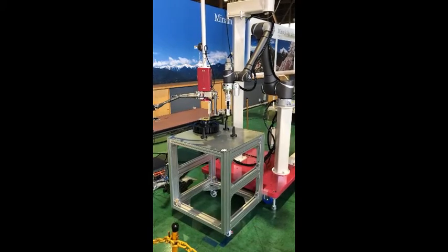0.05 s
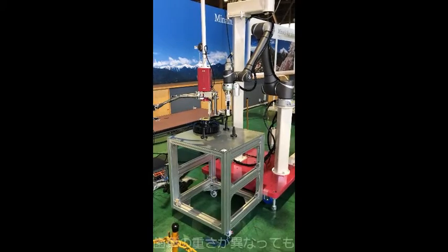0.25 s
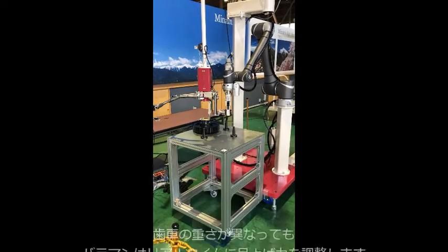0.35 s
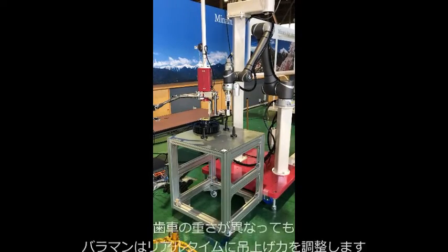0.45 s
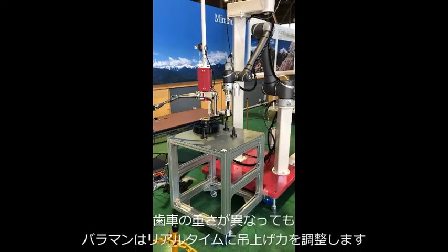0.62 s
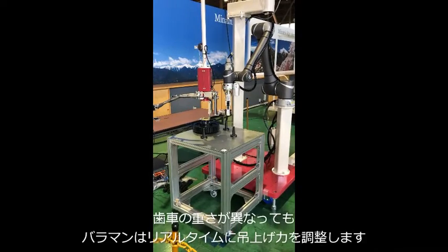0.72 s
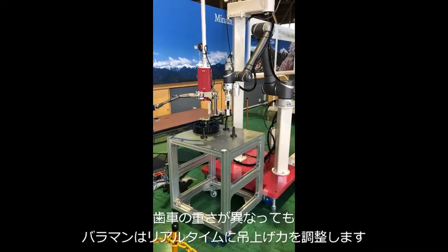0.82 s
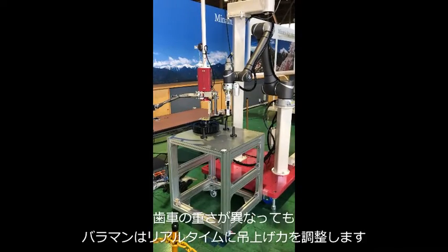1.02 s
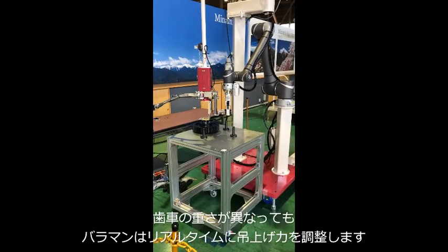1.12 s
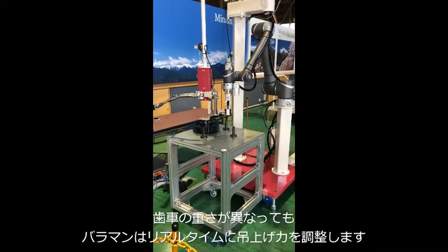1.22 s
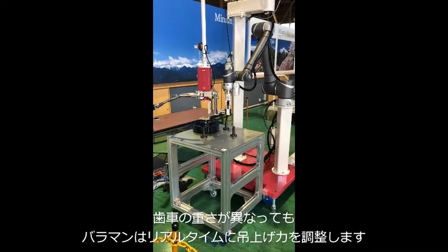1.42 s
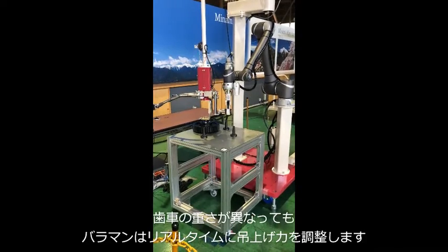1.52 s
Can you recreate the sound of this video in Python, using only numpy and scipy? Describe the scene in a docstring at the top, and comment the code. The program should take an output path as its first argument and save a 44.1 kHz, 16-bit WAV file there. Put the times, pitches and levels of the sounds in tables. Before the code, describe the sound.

A single bright hiss of compressed air escapes as a valve opens, with a slight ring and a soft low rush. It dies away in the echo of a large workshop, leaving steady ventilation and faint machine hum.

```python
"""Ventilation noise and a faint machine hum fill a large workshop hall.
At 0.2 s the valve of a pneumatic lifting arm opens: compressed air hisses through a ringing port.
The jet holds briefly, then dulls and fades as the pressure drains; a low rush peaks at 0.5 s.
The hall carries the hiss on for a second. The treble dips briefly a few times throughout."""
import sys
import numpy as np
from scipy import signal
from scipy.fft import irfft
from scipy.io import wavfile
from scipy.ndimage import uniform_filter1d

SR = 44100
rng = np.random.default_rng(int(sys.argv[2]) if len(sys.argv) > 2 else 0)


def wav_out(sig):
    """Save sig, one row per channel (or a flat mono array), as 16-bit PCM at SR to the path in sys.argv[1]."""
    wavfile.write(sys.argv[1], SR, np.round(np.clip(np.atleast_2d(sig).T, -1, 1) * 32767).astype(np.int16))


N = 68355
TIME_S = np.arange(N) / SR


def amp(db):
    """Decibels to gain."""
    return 10 ** (np.asarray(db) / 20)


def unit_rms(x):
    """Scales to rms 1."""
    return x / np.sqrt(np.mean(x ** 2) + 1e-20)


def lookup(table, hz):
    """Interpolates on a log-frequency axis."""
    table_hz, values = np.transpose(table)
    return np.interp(np.log(hz + 1), np.log(table_hz + 1), values)


def stft_filter(x, gain, size=256):
    """Filters x by the time-varying gain(Hz, s)."""
    frames = dict(fs=SR, nperseg=size, noverlap=size * 3 // 4)
    hz, t, spectra = signal.stft(x, **frames)
    return signal.istft(spectra * gain(hz[:, None], t), **frames)[1][:len(x)]


def noise(gain):
    """Noise of rms 1 with the spectrum gain(Hz)."""
    hz = np.fft.rfftfreq(N, 1 / SR)
    phasors = np.exp(2j * np.pi * rng.random(len(hz)))
    return unit_rms(irfft(gain(hz) * phasors, N))


def resonance(centre_hz, half_width_hz):
    """Noise of rms 1 in one narrow peak."""
    return noise(lambda hz: 1 / (1 + ((hz - centre_hz) / half_width_hz) ** 2))


# Ventilation spectrum (frequency [Hz], relative density [dB])
VENT_SPECTRUM = [(20, -32), (38, -20), (52, -2.5), (80, -6.5), (130, -2.5), (290, 0.5), (430, -8),
                 (600, -9), (900, -12.5), (1500, -16), (2300, -18.5), (3200, -25), (4500, -27),
                 (6000, -31.5), (10000, -37), (16000, -38.4)]

def ventilation(level_db=-47.5, patch_db=1.8):
    """Ventilation noise; patches of its spectrum drift in level, less so in the treble."""
    def patches(hz, t):
        field = rng.standard_normal((len(t), len(hz))).T
        field = uniform_filter1d(field, size=8, axis=0)
        field = uniform_filter1d(field, size=10, axis=1)
        return amp(patch_db * unit_rms(field) / (1 + hz / 3000))
    steady = noise(lambda hz: amp(lookup(VENT_SPECTRUM, hz)))
    return amp(level_db) * stft_filter(steady, patches, size=1024)


# Hum peaks (frequency [Hz], half width [Hz], level [dB])
HUM_PEAKS = [(101, 3.2, -58.5), (299, 17, -62.5), (514, 5.3, -63.5)]

def machine_hum():
    """A machine hums in narrow, wavering bands."""
    return sum(amp(db) * resonance(hz, half_width_hz) for hz, half_width_hz, db in HUM_PEAKS)


def low_rush(peak_s=0.51, sigma_s=0.16, level_db=-45, centre_hz=128):
    """A low rush of air swells and sinks behind the hiss."""
    swell = np.exp(-((TIME_S - peak_s) / sigma_s) ** 2 / 2)
    band = noise(lambda hz: np.exp(-np.log2((hz + 1) / centre_hz) ** 2))
    return amp(level_db) * swell * band


# Hall reverberation time (frequency [Hz], T60 [s])
HALL_DECAY = [(100, 3.6), (500, 1.8), (1500, 2.47), (2800, 2.03), (3950, 1.8), (4500, 1.3), (5500, 1.19),
              (8000, 0.79), (14000, 0.55)]
# Hall tail against the direct sound (frequency [Hz], level [dB])
HALL_LEVEL = [(100, 2), (1000, 4.5), (2000, 5), (2800, 3.5), (4000, -1), (7000, -3), (14000, -9.5)]

def hall(x, delay_s=0.013, build_s=0.022, half_turn_s=0.3027):
    """Diffuse echoes build and die, treble first; moving air drifts the sound between two tails."""
    def decay(hz, t):
        rate_per_s = np.log(1000) / lookup(HALL_DECAY, hz)
        energy_norm = np.sqrt(2 * rate_per_s / SR)
        return amp(lookup(HALL_LEVEL, hz)) * np.exp(-rate_per_s * t) * energy_norm
    build = np.clip((TIME_S - delay_s) / build_s, 0, 1)
    drift_rad = np.pi * TIME_S / half_turn_s
    reverb = np.zeros(N)
    for share in (np.cos(drift_rad), np.sin(drift_rad)):
        tail = build * stft_filter(noise(np.ones_like), decay)
        reverb += signal.fftconvolve(x * share, tail)[:N]
    return reverb


def near_surfaces(x, count=8, echoes_db=-10, latest_s=0.018):
    """Echoes from the table and floor join the direct hiss and colour it."""
    taps = np.zeros(SR // 10)
    delays_s = rng.uniform(latest_s / 10, latest_s, count)
    signs = rng.choice([-1., 1.], count)
    taps[(delays_s * SR).astype(int)] = amp(echoes_db) * signs / np.sqrt(count)
    taps[0] = 1
    return signal.fftconvolve(x, taps / np.linalg.norm(taps))[:N]


# Jet spectrum at full pressure (frequency [Hz], relative density [dB])
JET_SPECTRUM = [(40, -30), (100, -6.5), (200, -4.5), (400, -4), (600, -5.5), (1000, -6.5), (1900, -6),
                (2700, -2), (3500, 2.5), (4100, 1.5), (4700, 0.9), (5500, -2.3), (7500, -6), (11000, -5.5),
                (13500, -9), (16000, -9.5)]
# Exhaust port resonances (frequency [Hz], half width [Hz], level [dB])
PORT_MODES = [(3334, 33, -45.5), (3674, 70, -43), (3836, 140, -36.5), (3975, 130, -36.5), (4480, 36, -40.5),
              (4845, 70, -47), (8040, 40, -56)]
# Fade as the pressure drains (frequency [Hz], rate [dB/s])
DRAIN_RATE = [(100, 38), (500, 57.5), (1500, 51), (3800, 64), (4600, 74), (8000, 97), (15000, 170)]

def exhaust(open_s=0.2107, opening_s=0.028, hold_s=0.11, knee_s=0.026,
            leak_db=-33.5, jet_db=-27.5, flutter_db=0.84, flutter_hz=110):
    """Jet and port swell as the valve opens, flutter with turbulence and fade with the pressure."""
    jet = amp(jet_db) * noise(lambda hz: amp(lookup(JET_SPECTRUM, hz)))
    port = sum(amp(db) * resonance(hz, half_width_hz) for hz, half_width_hz, db in PORT_MODES)

    def drain(hz, t):
        draining_s = knee_s * np.logaddexp(0, (t - open_s - hold_s) / knee_s)  # soft onset
        return amp(-lookup(DRAIN_RATE, hz) * draining_s)
    hiss = stft_filter(jet + port, drain)
    closure = np.clip(1 - (TIME_S - open_s) / opening_s, 0, 1)
    valve = amp(leak_db * closure) * (TIME_S > open_s)
    flutter = amp(flutter_db * resonance(0, flutter_hz))
    return hiss * valve * flutter


def scene():
    """One air burst and its echoes over the background, mono."""
    burst = near_surfaces(exhaust())
    return (burst + hall(burst) + low_rush() + ventilation() + machine_hum())[None]


# Treble dips (time [s], lower edge [Hz], gain [dB])
TREBLE_DIPS = [(.034, 2860, -13), (0.141, 3650, -18), (0.653, 4700, -13), (1.165, 4100, -17),
               (1.314, 4060, -16), (1.378, 3020, -19)]

def record(dry, dip_half_width_s=0.0067, cutoff_hz=15850):
    """Brief treble dips, then a steep low-pass."""
    def dips(hz, t):
        gain_db = 0
        for time_s, edge_hz, dip_db in TREBLE_DIPS:
            pulse = np.exp(-((t - time_s) / dip_half_width_s) ** 2)
            treble = np.clip(2 * (hz / edge_hz - 1) + 0.5, 0, 1)
            gain_db += dip_db * pulse * treble
        return amp(gain_db)
    low_pass = signal.firwin(511, cutoff_hz, window=("kaiser", 9), fs=SR)
    return signal.oaconvolve(stft_filter(dry[0], dips), low_pass, "same")[None]


dry = scene()
out = record(dry)
wav_out(out)
```